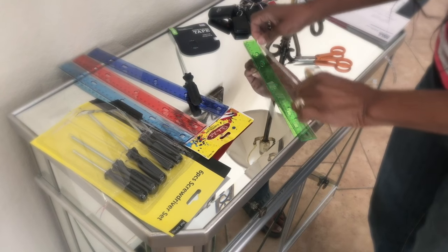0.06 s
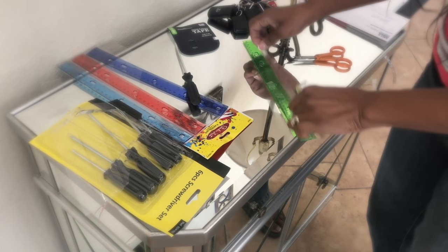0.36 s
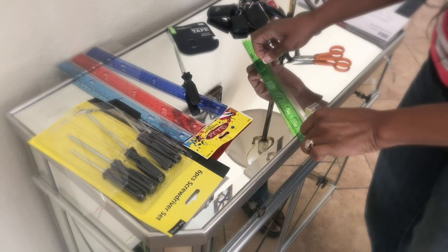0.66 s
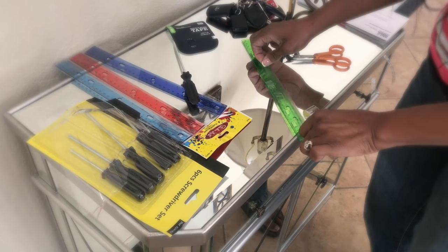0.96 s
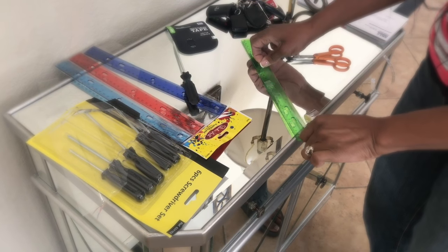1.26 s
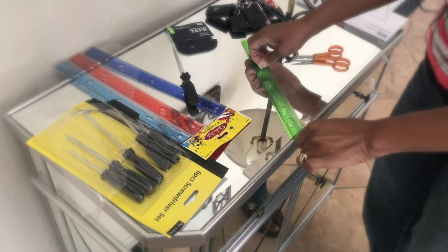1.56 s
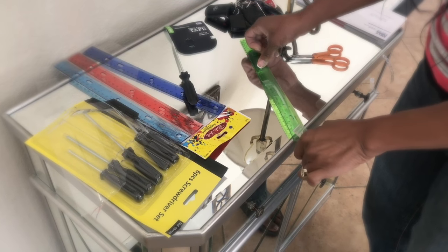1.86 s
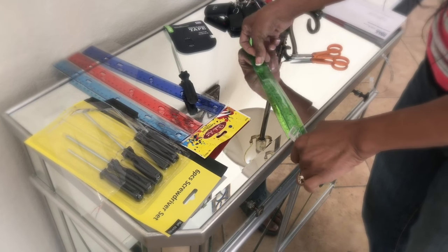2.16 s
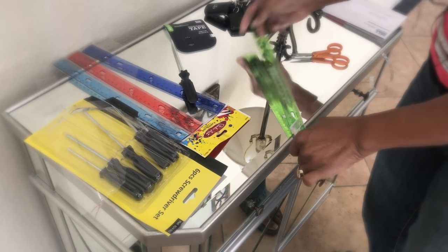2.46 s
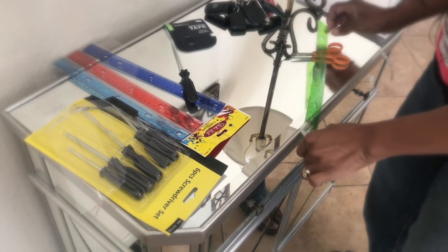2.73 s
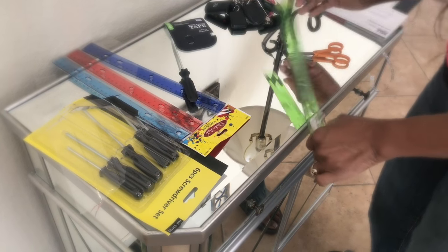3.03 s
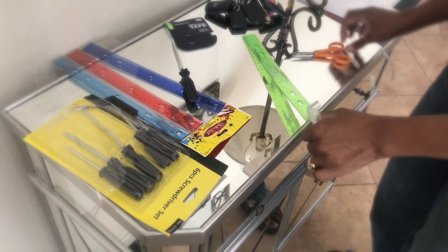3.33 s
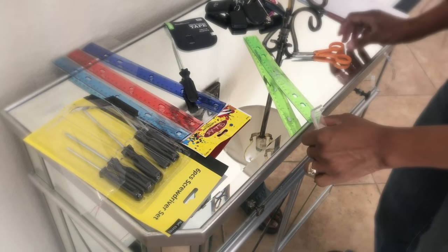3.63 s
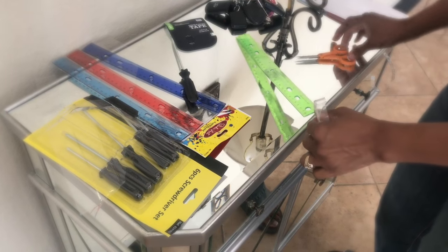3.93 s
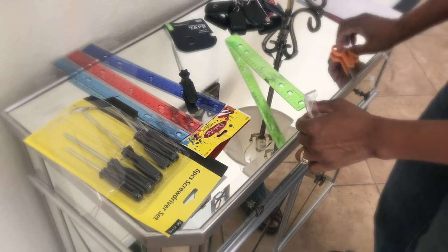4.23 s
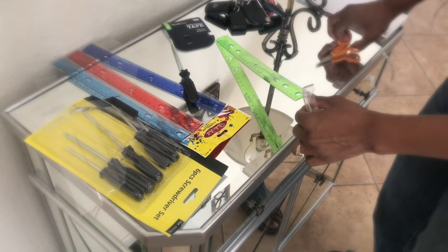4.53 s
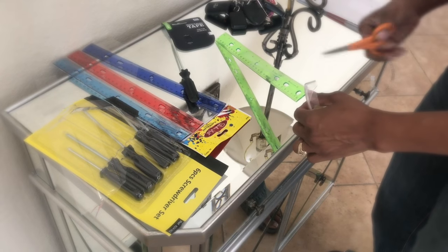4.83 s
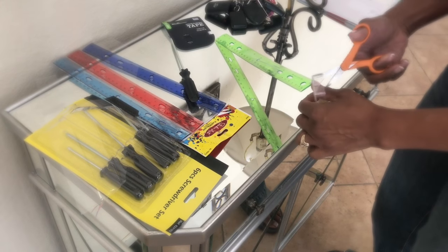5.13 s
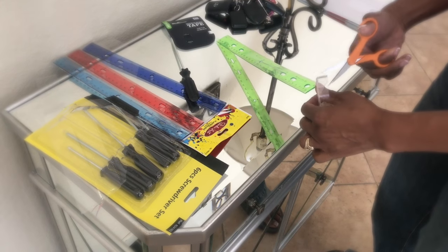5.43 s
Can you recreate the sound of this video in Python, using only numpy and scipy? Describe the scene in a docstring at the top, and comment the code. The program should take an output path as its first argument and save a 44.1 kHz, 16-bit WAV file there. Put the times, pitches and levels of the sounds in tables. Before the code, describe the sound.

A ventilation fan hums steadily in a small room. Hands press tape onto a plastic ruler, making scattered ticks and a sharp snap. A soft, faintly crackling hiss swells as the ruler clatters onto a glass table, followed by more snaps and rattles. The hiss stops abruptly, then scissors are picked up and worked with dull clacks, brief scrapes and light ticks, all heard from nearby.

```python
"""A ventilation fan hums throughout in a small room. From about 1 s, hands press double-sided tape
onto a plastic ruler: it ticks and snaps. A soft, faintly crackling hiss swells from about 2 s and
stops abruptly at 3.7 s. Near 2.85 s the ruler clatters onto a glass table.
From 3.8 s scissors are picked up, and their blades work with dull clacks and light ticks.
The harder a contact, the brighter it is; the softer, the more it shakes the table."""
import sys
import numpy as np
from scipy import signal
from scipy.fft import rfft, irfft, next_fast_len
from scipy.io import wavfile
from scipy.ndimage import map_coordinates

SR = 44100
rng = np.random.default_rng(int(sys.argv[2]) if len(sys.argv) > 2 else 0)


def master(y):
    """Save y as 16-bit WAV."""
    cut = np.clip(np.atleast_2d(y).T, -1, 1)
    pcm = np.round(cut * 32767)  # scale
    wavfile.write(sys.argv[1], SR, pcm.astype(np.int16))


N = 250929
SCENE_S = np.arange(N) / SR
BLOW_S = np.arange(SR // 3) / SR


def amp(db):
    """Decibels to gain."""
    return 10 ** (np.asarray(db) / 20)


def unit(x):
    """Scale to rms 1."""
    return x / np.sqrt(np.mean(np.abs(x) ** 2) + 1e-20)


def along(points, hz):
    """Read (Hz, value) points on a log axis."""
    knots_hz, values = np.transpose(points)
    return np.interp(np.log(hz + 1), np.log(knots_hz), values)


def filtered(x, response):
    """Apply a frequency response."""
    n = x.shape[-1]
    size = next_fast_len(n + 8192, real=True)
    return irfft(rfft(x, size) * response(np.fft.rfftfreq(size, 1 / SR)), size)[..., :n]


def resonances(modes, broad_db=-120):
    """Response of (Hz, width in Hz, dB) modes over a flat floor."""
    return lambda f: amp(broad_db) + sum(
        amp(db) * 1j * f * width / (hz * hz - f * f + 1j * f * width) for hz, width, db in modes)


def noise(spectrum, samples=N):
    """Coloured noise, rms 1."""
    return unit(filtered(rng.standard_normal(samples), lambda hz: amp(along(spectrum, hz))))


def wobble(knots_per_s):
    """A smooth random curve."""
    return map_coordinates(rng.standard_normal(512), [SCENE_S * knots_per_s], mode="wrap")


def fade(t60_s):
    """Exponential decay, 60 dB in t60_s."""
    return np.exp(-np.log(1000) * BLOW_S / t60_s)


def swells(strokes):
    """Gain of strokes that rise to a peak and fall away."""
    return sum(amp(db) * np.exp(-np.maximum((peak_s - SCENE_S) / rise_s, (SCENE_S - peak_s) / fall_s))
               for peak_s, rise_s, fall_s, db in strokes)


def add(track, start_s, sound):
    """Mix a sound into the track."""
    part = track[round(start_s * SR):][:len(sound)]
    part += sound[:len(part)]


def ring_down(impulses, t60_s):
    """Envelope of impulses whose energies add and decay."""
    return np.sqrt(np.abs(signal.fftconvolve(impulses ** 2, fade(t60_s) ** 2)[:N]))


def chatter(strokes, modes, contacts_per_s, t60_s):
    """Many tiny contacts swell and die away through an object's resonances."""
    contacts = (rng.random(N) < contacts_per_s / SR) * rng.standard_normal(N)
    grains = ring_down(contacts, t60_s) * rng.standard_normal(N)
    return swells(strokes) * unit(filtered(grains, resonances(modes)))


# Fan tones. Each row: frequency in Hz, level in dB, waver from 0 to 1.
FAN_TONES = [(54.8, -64, 1), (123.85, -57.5, 0.68), (172.8, -64.5, 0.91), (300.5, -78.5, 0.7),
             (395.7, -76.5, 0.43), (609.3, -77.5, 0.96), (816, -82.5, 0.8)]
# Rumble and air spectra. Each row: frequency in Hz, relative density in dB.
RUMBLE_SPECTRUM = [(20, -22), (32, -9), (45, 1), (55, 10.5), (72, -7.5), (88, 4), (99, 9), (112, 5.5),
                   (128, 10.5), (148, -5), (172, 3.5), (195, 0), (225, -10), (300, -42.5)]
AIR_SPECTRUM = [(150, -17.5), (240, -1.5), (330, -4), (480, -10), (650, -8.5), (1150, -13), (1700, -17.5),
                (2600, -19), (4200, -23.5), (5500, -26.5), (8000, -32), (12000, -32), (16000, -32)]

def fan():
    """Wavering tones over a low rumble and an even rush of air."""
    tones = np.zeros(N)
    for hz, db, waver in FAN_TONES:
        drift = 1 - waver + waver * (wobble(8) + 1j * wobble(8))
        tones += amp(db) * unit(np.real(drift * np.exp(2j * np.pi * hz * SCENE_S)))
    return tones + amp(-52) * noise(RUMBLE_SPECTRUM) + amp(-63.5) * noise(AIR_SPECTRUM)


# Room decay. Each row: frequency in Hz, t60 in seconds.
ROOM_DECAY = [(250, 0.51), (1200, 0.76), (5000, 0.37), (14000, 0.15)]

def in_room(blow, wet_db):
    """A blow plus its diffuse tail: near surfaces answer first, the treble dies fastest."""
    hz, frame_s, spectra = signal.stft(rng.standard_normal(len(BLOW_S)), SR, nperseg=256)
    decay = np.exp(-np.log(1000) * frame_s / along(ROOM_DECAY, hz)[:, None])
    tail = signal.istft(spectra * decay, SR, nperseg=256)[1][:len(BLOW_S)]
    tail = tail * (1 - fade(0.01)) * (1 + 0.74 * fade(0.024))
    return blow + amp(wet_db) * signal.fftconvolve(blow, tail / np.linalg.norm(tail))[:len(BLOW_S)]


def crackling_noise(spectrum):
    """Soft noise with a sparse, fine crackle, rms 1."""
    impulses = (rng.random(N) < 130 / SR) * rng.uniform(0.24, 1, N)
    crackle = unit(ring_down(impulses, t60_s=0.0062) * noise(spectrum))
    return unit(noise(spectrum) + amp(-6) * crackle)


# Hiss contour. Each row: time in seconds, level of the treble alone in dB.
HISS_TREBLE = [(1.9, -83.5), (2.322, -79), (2.442, -75), (2.822, -76), (2.942, -74.5), (3.096, -75.5),
               (3.236, -73), (3.54, -75.5), (3.69, -75)]
# Finger brushes. Each row: peak time, rise and fall in seconds, level in dB.
FINGER_BRUSHES = [(1.3, .08, .1, -72), (2.47, 0.13, 0.023, -57), (4.03, 0.088, 0.11, -67),
                  (4.185, .04, 0.037, -62), (4.71, .09, 0.043, -64), (4.98, .15, .05, -71)]
# Hiss and brush spectra. Each row: frequency in Hz, relative density in dB.
HISS_SPECTRUM = [(400, -7.5), (1500, -4.5), (4000, -0.5), (7000, -2), (10000, -2), (13000, 0.5),
                 (15500, -3.5)]
BRUSH_SPECTRUM = [(1500, -5), (7000, -6), (10000, -4), (13000, -2), (15500, -3.5)]

def hiss_and_brushes():
    """A soft hiss swells and stops abruptly; fingers brush in short strokes."""
    rise_s, fall_s, whole_over_treble_db = 0.12, 0.021, 10
    times_s, treble_db = np.transpose(HISS_TREBLE)
    falloff = np.maximum((times_s[0] - SCENE_S) / rise_s, (SCENE_S - times_s[-1]) / fall_s).clip(0)
    hiss_db = np.interp(SCENE_S, times_s, treble_db) + whole_over_treble_db
    hiss = amp(hiss_db) * np.exp(-falloff) * crackling_noise(HISS_SPECTRUM)
    brushes = swells(FINGER_BRUSHES) * crackling_noise(BRUSH_SPECTRUM)
    return (hiss + brushes) * amp(0.7 * wobble(23.5))


# Backing crinkles. Each row: peak time, rise and fall in seconds, level in dB.
BACKING_CRINKLES = [(2.839, .012, .005, -54), (3.04, 0.013, 0.016, -55), (4.043, 0.0071, 0.011, -53),
                    (5.015, .002, 0.0034, -59), (5.157, 0.0035, .006, -58.5)]
# Backing resonances. Each row: centre and width in Hz, gain in dB.
BACKING_MODES = [(9500, 2000, 3), (13200, 5100, 1)]

def crinkling():
    """The tape's backing crinkles in short, bright bursts."""
    return chatter(BACKING_CRINKLES, BACKING_MODES, contacts_per_s=310, t60_s=0.025)


# Table top modes. Each row: frequency in Hz, relative level in dB, t60 in seconds.
TOP_MODES = [(213.3, -4.5, 0.16), (272, -12.5, 0.11), (328, 6.5, 0.18), (362, 3.5, 0.099)]
# Table frame spectrum. Each row: frequency in Hz, relative density in dB.
FRAME_SPECTRUM = [(25, -31), (50, -10), (110, -0.5), (200, -6), (300, -3.5), (370, -18.5), (600, -17),
                  (1500, -35)]

def table(thud_db, shudder_db):
    """The frame shudders and the top rings low, a little differently at each blow."""
    shudder = noise(FRAME_SPECTRUM, len(BLOW_S)) * fade(0.49) * (1 - fade(0.015))
    thud = np.zeros(len(BLOW_S))
    for hz, db, t60_s in TOP_MODES:
        gain = amp(db + rng.normal(0, 1))
        thud += gain * np.sin(2 * np.pi * hz * rng.normal(1, 0.01) * BLOW_S) * fade(t60_s)
    return amp(thud_db) * thud * (1 - fade(0.025)) + amp(shudder_db) * shudder


def band_levels(db, hardness_db, knock_db, sizzle_db):
    """Knock, ring and sizzle levels in dB: hardness trades knock for sizzle."""
    return db + knock_db - hardness_db, db, db + sizzle_db + hardness_db


# Knock, ring and sizzle bands. Each row: lower and upper edge in Hz.
BANDS_HZ = [(250, 2500), (2500, 9000), (9000, 16500)]

def struck(modes, levels_db, t60s_s, broad_db):
    """A contact's dying chatter through an object's resonances, in three bands."""
    sound = np.zeros(len(BLOW_S))
    dying = np.array([rng.standard_normal(len(BLOW_S)) * fade(t60_s) for t60_s in t60s_s])
    rings = filtered(dying, resonances(modes, broad_db))
    for edges_hz, db, ring in zip(BANDS_HZ, levels_db, rings):
        band = signal.sosfilt(signal.butter(3, edges_hz, "bandpass", fs=SR, output="sos"), ring)
        sound += amp(db) * band / np.linalg.norm(band)
    return sound * np.sqrt(0.004 * SR)  # 0 dB: the energy of 4 ms at rms 1


def crack(hz, echo_db):
    """The first instant of a hard contact, and its echo off the table top."""
    width_s, echo_s = 0.00011, 0.0011
    snap = np.cos(2 * np.pi * hz * BLOW_S) * np.exp(-0.5 * (BLOW_S / width_s - np.pi) ** 2)
    return snap + amp(echo_db) * np.roll(snap, round(echo_s * SR))


# Scissor handle modes. Each row: frequency in Hz, relative level in dB, t60 in seconds.
HANDLE_MODES = [(1203, 1, 0.077), (1280, 0.5, 0.12), (1425, -5, 0.09), (5960, -12, 0.06)]

def handles():
    """The handles ring with a short hollow knock."""
    ring = np.zeros(len(BLOW_S))
    for hz, db, t60_s in HANDLE_MODES:
        gain = amp(db + rng.normal(0, 1))
        ring += gain * np.sin(2 * np.pi * (hz * BLOW_S + rng.random())) * fade(t60_s)
    return ring * (1 - fade(0.0027))


# Scissor resonances. Each row: centre and width in Hz, gain in dB.
SCISSOR_MODES = [(567, 130, 7.5), (990, 560, 5.5), (1190, 530, -12), (2140, 340, 6), (3400, 3700, 3),
                 (4000, 1100, 0), (6600, 2100, -6), (12600, 2000, -30)]
# Clacks. Each row: start in seconds, strength in dB, hardness in dB, strongest ring in Hz.
SCISSOR_CLACKS = [(3.769, -57, -1.5, 1790), (3.8259, -39, 0.5, 5040), (3.9737, -60.5, -12.5, 1920),
                  (4.1981, -39.5, 0, 1300), (4.2065, -58, -15.5, 1360), (4.4173, -61.5, -14.5, 1200),
                  (4.4267, -43.5, 6.5, 1180), (4.437, -41, -1.5, 1190), (5.1667, -52.5, 5.5, 3950),
                  (5.3314, -56.5, 1, 3810), (5.6193, -59, 0.5, 1980)]
# Scrapes. Each row: peak time, rise and fall in seconds, level in dB.
SCISSOR_SCRAPES = [(3.868, 0.0096, 0.035, -58.5), (4.228, 0.01, 0.017, -57), (4.432, 0.029, .028, -55),
                   (4.49, 0.011, 0.017, -63), (4.556, 0.0054, 0.009, -59)]

def scissors():
    """Hand-damped blades clack and scrape; heavy, low contacts ring the handles and the table."""
    handle_hz, lighter_db_per_octave = 1223, 5
    track = np.zeros(N)
    for start_s, db, hardness_db, ring_hz in SCISSOR_CLACKS:
        levels_db = band_levels(db, hardness_db, knock_db=-3, sizzle_db=-5)
        modes = SCISSOR_MODES + [(ring_hz, 0.1 * ring_hz, 11)]  # favoured by the place of contact
        ring = struck(modes, levels_db, t60s_s=[0.055, 0.035, 0.028], broad_db=-18)
        snap = amp(db - 2) * crack(hz=4300, echo_db=0)
        weight_db = levels_db[0] - lighter_db_per_octave * np.log2(ring_hz / handle_hz)
        body = amp(weight_db) * (amp(-5.5) * handles() + table(thud_db=-8.5, shudder_db=-7.5))
        add(track, start_s, snap + in_room(ring, wet_db=-10.5) + body)
    return track + chatter(SCISSOR_SCRAPES, SCISSOR_MODES, contacts_per_s=440, t60_s=0.027)


# Ruler resonances. Each row: centre and width in Hz, gain in dB.
RULER_MODES = [(675, 320, -5), (1430, 160, -1), (1955, 140, 8.5), (2560, 300, -10), (4100, 2800, -10),
               (7150, 4000, -5), (13000, 3000, -24.5)]
# Slaps. Each row: start in seconds, strength in dB, hardness in dB.
RULER_SLAPS = [(2.8478, -38, 6.5), (2.8508, -40, -1), (2.9029, -48.5, -3)]

def ruler_slaps():
    """The flat of the ruler slaps down and shakes the table."""
    track = np.zeros(N)
    for start_s, db, hardness_db in RULER_SLAPS:
        levels_db = band_levels(db, hardness_db, knock_db=-3, sizzle_db=2.5)
        slap = struck(RULER_MODES, levels_db, t60s_s=[0.05, 0.025, 0.022], broad_db=-4.5)
        add(track, start_s, in_room(slap, wet_db=-9.5))
        add(track, start_s, amp(levels_db[0]) * table(thud_db=-23, shudder_db=-9.5))
    return track


# Plastic resonances. Each row: centre and width in Hz, gain in dB.
PLASTIC_MODES = [(603, 67, 6.5), (998, 570, -0.5), (3400, 370, -23.5), (4610, 740, -10.5), (6250, 2500, -4),
                 (7140, 730, 0.5), (12780, 4100, 6), (13920, 2000, -11)]
# Rattles. Each row: peak time, rise and fall in seconds, level in dB.
RULER_RATTLES = [(2.876, 0.026, 0.0083, -50), (2.903, .004, 0.01, -62), (3.224, 0.0033, 0.057, -51.5),
                 (3.262, .006, 0.013, -52), (3.317, 0.0044, 0.024, -49)]

def ruler_rattles():
    """The loose ruler rattles in tiny, quick contacts."""
    return chatter(RULER_RATTLES, PLASTIC_MODES, contacts_per_s=700, t60_s=0.0027)


def tick(db, hardness_db, crack_db):
    """Stiff plastic snaps: a crack, higher for a harder contact, then a brief ring."""
    crack_hz = min(3550 * 2 ** (hardness_db / 6), 14000)
    levels_db = band_levels(db, hardness_db, knock_db=-5, sizzle_db=-5)
    modes = PLASTIC_MODES + [(crack_hz, 0.1 * crack_hz, -1)]
    ring = struck(modes, levels_db, t60s_s=[0.045, 0.015, 0.012], broad_db=-6)
    snap = amp(db + crack_db) * crack(crack_hz, echo_db=-16.5)
    return snap + in_room(ring, wet_db=-13) + amp(levels_db[0]) * table(thud_db=-12, shudder_db=-0.5)


# Ticks. Each row: start in seconds, strength, hardness and crack over ring in dB, contact count.
TAPE_TICKS = [(1.1109, -53, 2, 11.5, 2), (1.2906, -51, 16, 27, 1), (1.5367, -58.5, 5.5, 14, 1),
              (1.7696, -48.5, -1, -1, 1), (2.1271, -61, -1.5, 17.5, 1), (2.2981, -33, 7, 18, 1),
              (2.528, -53, 2.5, 12, 1), (2.7442, -54, -2, 6, 1), (2.8043, -49.5, 5.5, 3, 1),
              (2.846, -35, 13.5, 10, 1), (2.8998, -47, -0.5, 8, 1), (2.9243, -52.5, 11, 2, 1),
              (3.0741, -43.5, 9, 9.5, 1), (3.2025, -31.5, 12, 28.5, 1), (3.2156, -37.5, 6.5, 22.5, 1),
              (3.2984, -41.5, 16.5, 17, 3), (3.3861, -49.5, 13.5, 7, 3), (3.4643, -51, -2.5, -2, 1),
              (3.4992, -61, -11, 9, 1)]

def tape_ticks():
    """Tape and ruler tick, some ticks with quick rebounds that grow weaker and softer."""
    rebound_s, weaker_db, softer_db = 0.007, 1.5, 3
    track = np.zeros(N)
    for start_s, db, hardness_db, crack_db, contacts in TAPE_TICKS:
        for k in range(round(contacts)):
            contact = tick(db - k * weaker_db, hardness_db - k * softer_db, crack_db)
            add(track, start_s + k * rebound_s, contact)
    return track


def scene():
    """The work at the table over the fan's hum, in mono."""
    contacts = tape_ticks() + ruler_slaps() + ruler_rattles() + scissors()
    return (contacts + hiss_and_brushes() + crinkling() + fan())[None]


# Microphone response. Each row: frequency in Hz, gain in dB.
MIC_RESPONSE = [(4400, -1), (4950, -5.5), (5500, -2.5), (7100, -3), (7800, -5), (8800, -2.5), (10400, -8),
                (11600, -5.5), (15000, -8)]

def record(dry):
    """The microphone's port colours the treble, up to a steep band limit."""
    limit_hz = 16100
    response = lambda hz: amp(along(MIC_RESPONSE, hz)) / np.sqrt(1 + (hz / limit_hz) ** 200)
    return filtered(dry, response)


dry = scene()
out = record(dry)
master(out)
```